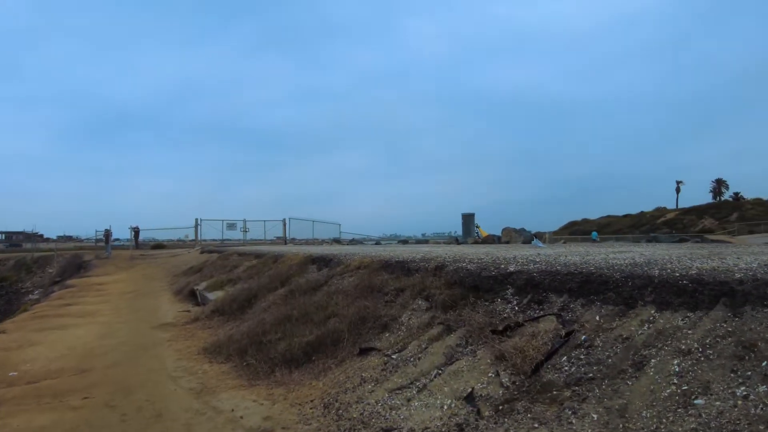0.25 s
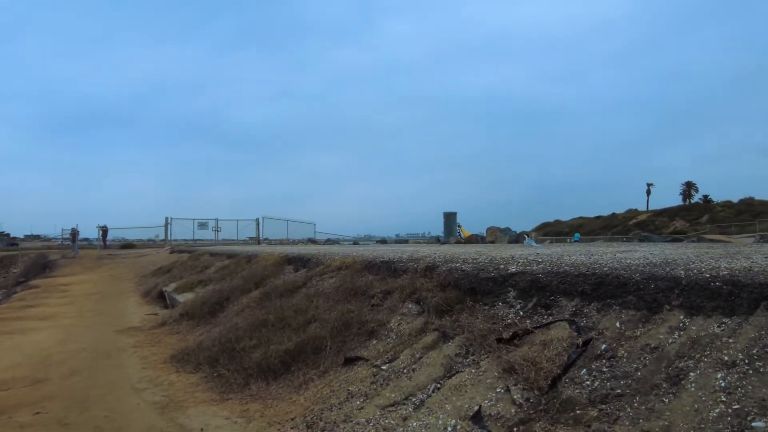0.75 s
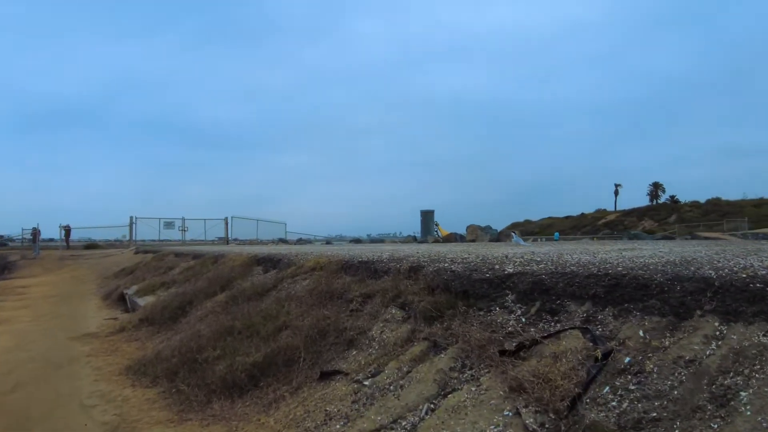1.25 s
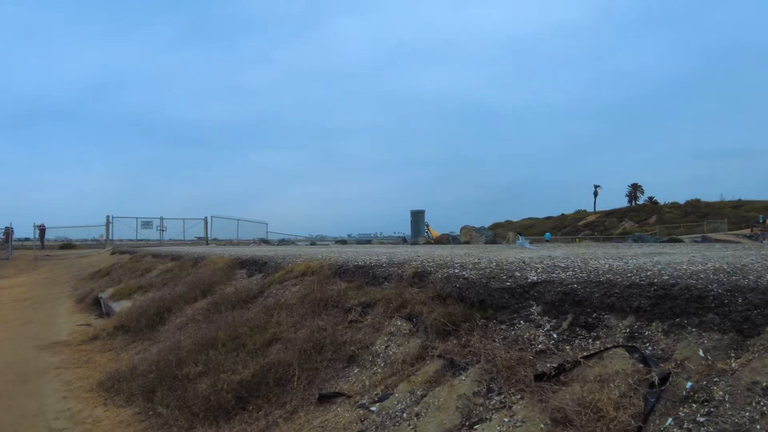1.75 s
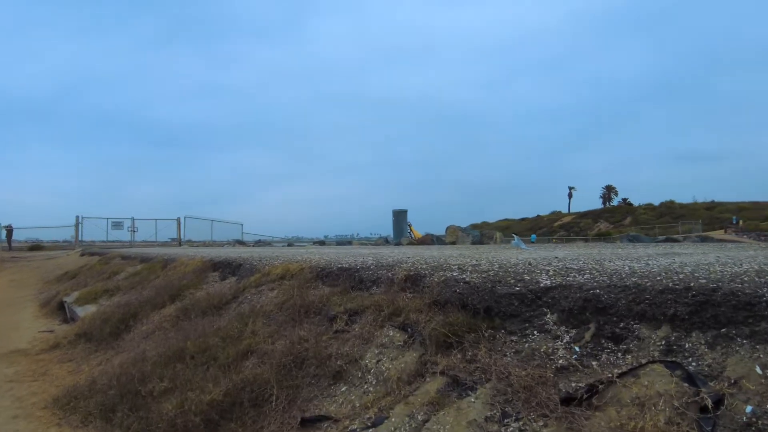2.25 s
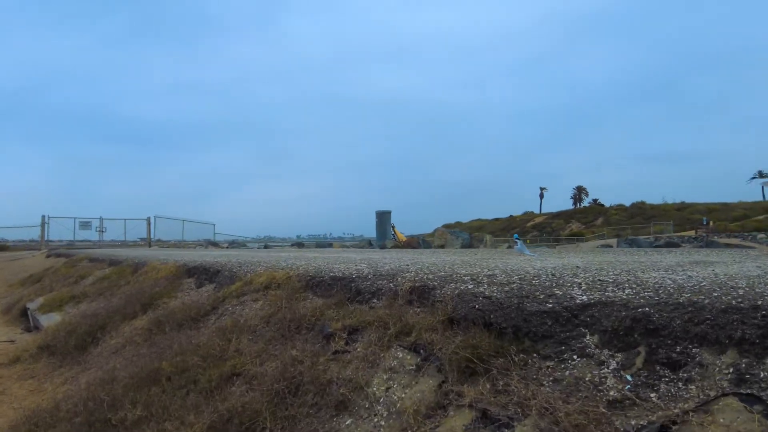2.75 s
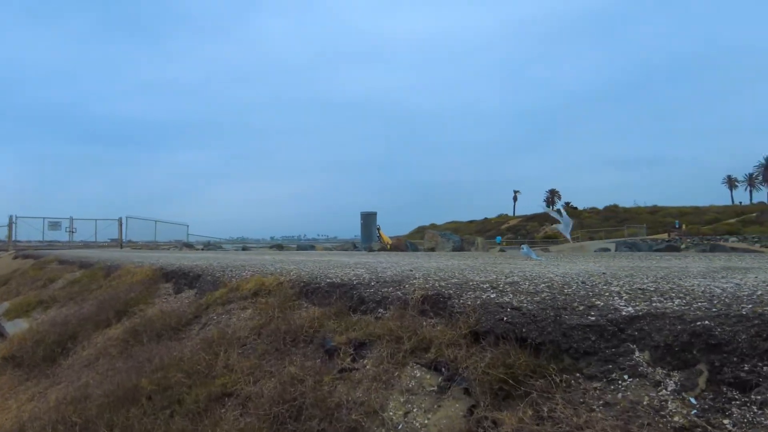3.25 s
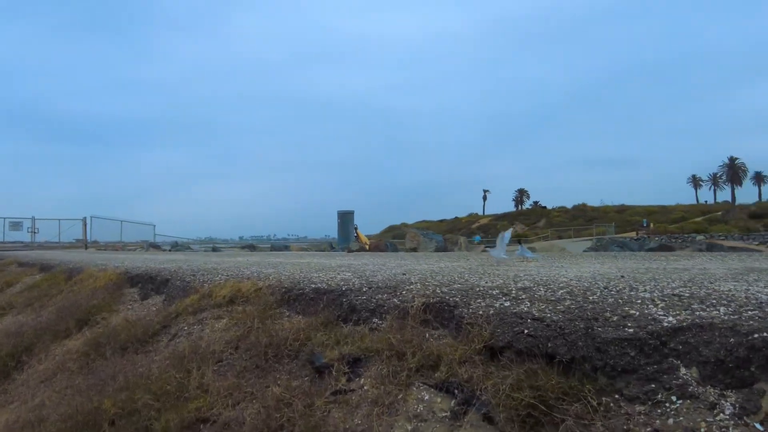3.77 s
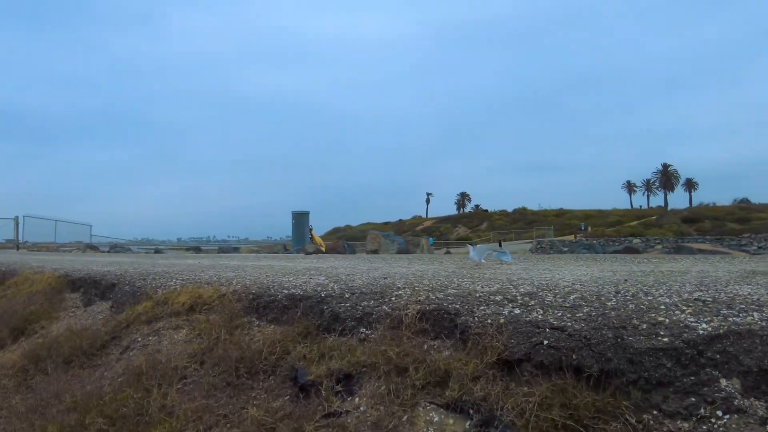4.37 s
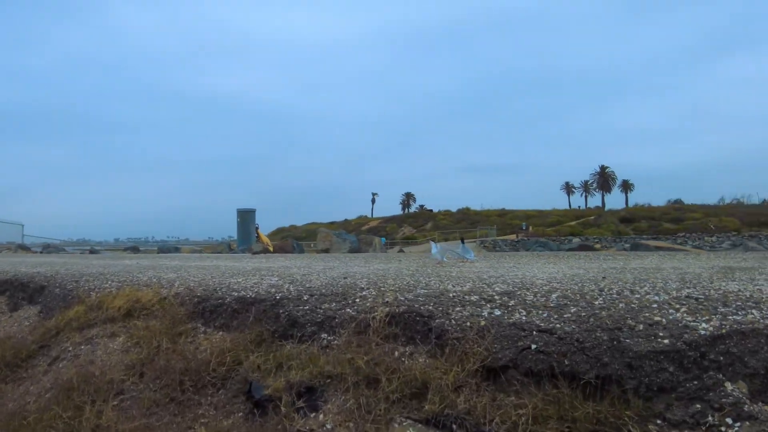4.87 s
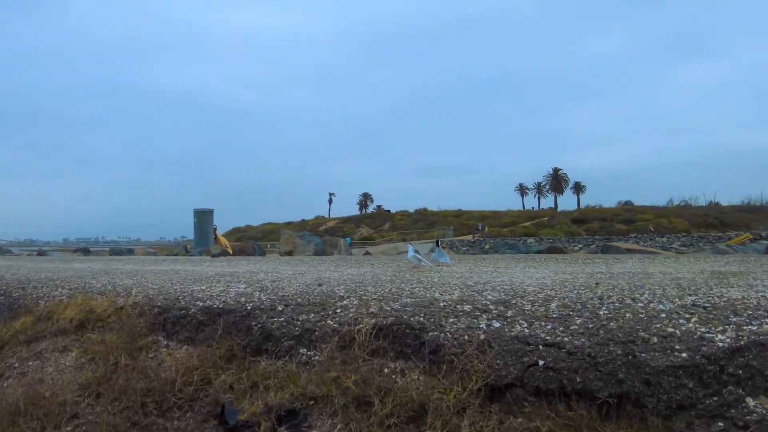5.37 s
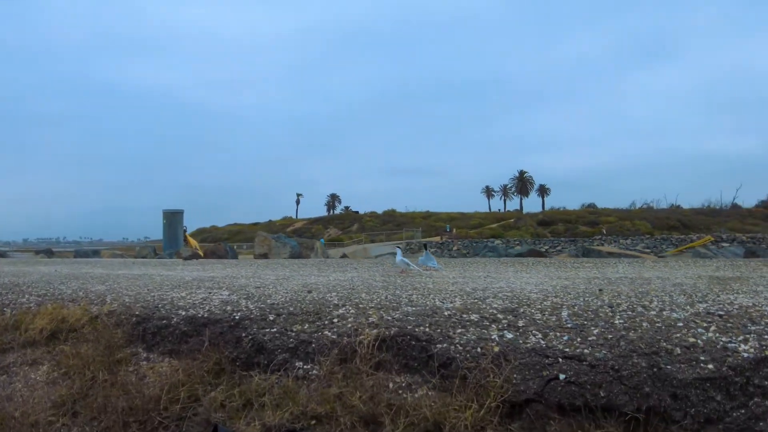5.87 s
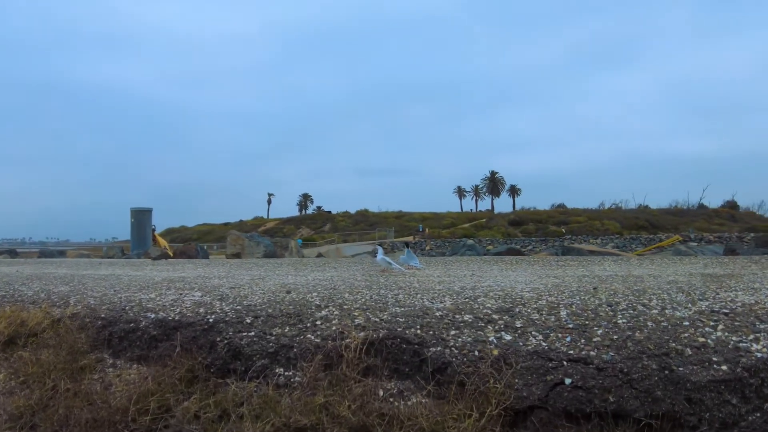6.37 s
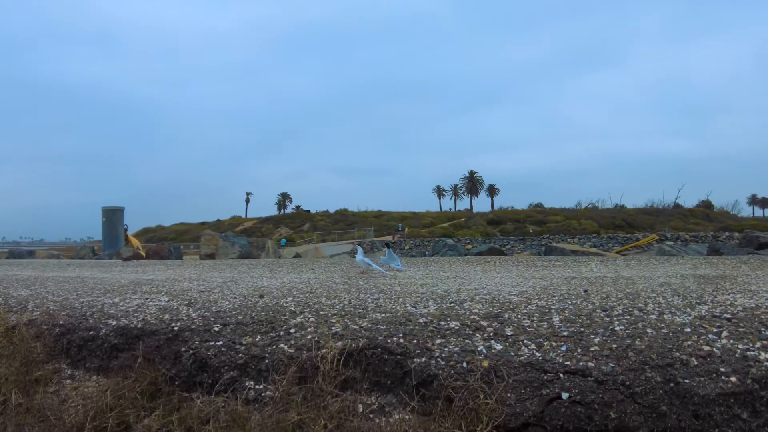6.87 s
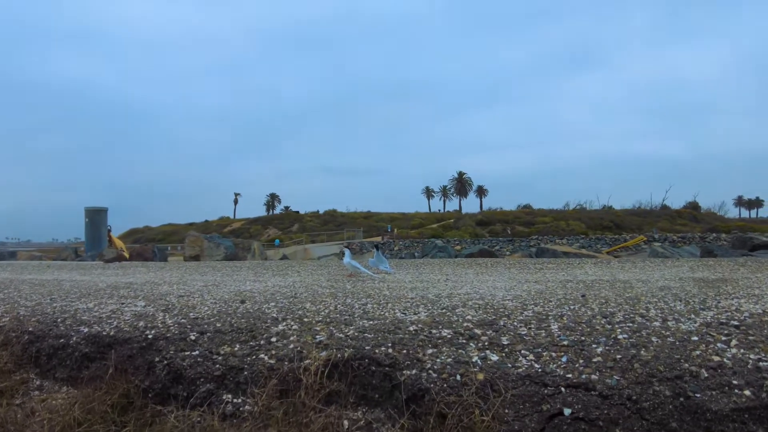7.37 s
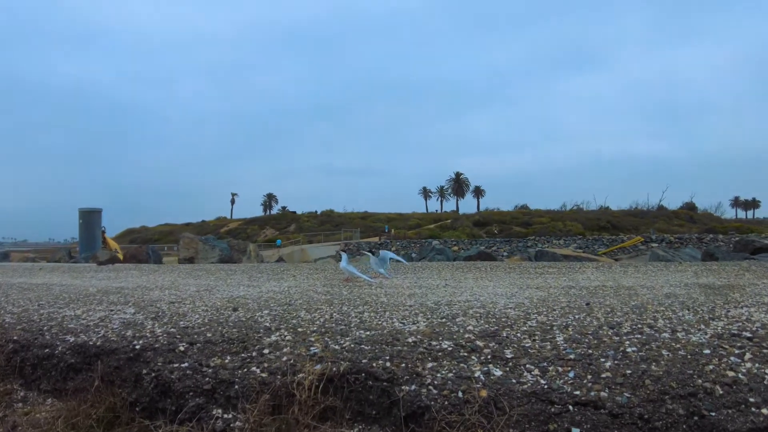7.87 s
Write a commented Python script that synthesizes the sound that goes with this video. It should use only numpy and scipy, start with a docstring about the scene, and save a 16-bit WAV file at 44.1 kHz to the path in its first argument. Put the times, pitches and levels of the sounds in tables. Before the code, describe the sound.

Two terns call outdoors: sharp falling keks and dry rattles, a harsh landing rasp, then lower keks together over low far rumble.

```python
"""Terns on a shell bank

By a coastal marsh, one tern flies in with sharp falling "kek" calls and lands with a rasp; the other answers
in rattling trills, then both call on the ground. Keks are harmonic glides, trills chopped whistles, the rasp
a pulsed ringing throat and the clucks short bursts of uneven cycles. Behind them filtered noise makes far air,
soft footsteps, low wind buffets and a faint high insect; wavering sines make an engine drone and far chirps."""
import sys
import numpy as np
from scipy import signal
from scipy.fft import rfft, irfft, next_fast_len
from scipy.io import wavfile
from scipy.ndimage import map_coordinates

SR = 44100
rng = np.random.default_rng(int(sys.argv[2]) if len(sys.argv) > 2 else 0)


def wrap_up_sound(samples):
    """Save the sound to the file named by the first command line argument, as 16-bit audio."""
    columns = np.atleast_2d(samples).T
    # keep every value between -1 and 1, then stretch to whole-number steps
    tamed = np.clip(columns, -1, 1)
    steps = np.round(tamed * 32767).astype(np.int16)
    wavfile.write(sys.argv[1], SR, steps)


N = 358091
TIME = np.arange(N) / SR
TOP_HZ = 15750  # upper limit of the sound


def undb(db):
    """Decibels to gain."""
    return 10 ** (np.asarray(db) / 20)


def unit(x):
    """Scale to rms 1."""
    return x / np.sqrt(np.mean(x ** 2) + 1e-18)


def curve(table, at):
    """A two-column table joined by straight lines."""
    return np.interp(at, *np.transpose(table))


def colour(points, hz):
    """Gain of a (Hz, dB) spectrum at the given frequencies."""
    f, db = np.transpose(points)
    return undb(np.interp(np.log(hz + 1), np.log(f), db))


def shaped(x, points):
    """Pass a sound through a (Hz, dB) spectrum."""
    size = 2 ** 19
    hz = np.arange(size // 2 + 1) * SR / size
    return irfft(rfft(x, size) * colour(points, hz))[:N]


def resonate(x, hz, width_hz):
    """One resonance, gain 1 at its centre."""
    return signal.lfilter(*signal.iirpeak(min(hz, SR / 2 - 1), hz / width_hz, fs=SR), x)


def ringing_noise(hz, width_hz):
    """Noise of full length through the same resonance twice."""
    return resonate(resonate(rng.standard_normal(N), hz, width_hz), hz, width_hz)


def steady(x):
    """Even out the strength of a narrow-band sound, leaving its wavering pitch."""
    return np.cos(np.angle(signal.hilbert(x, next_fast_len(N))[:N]))


def wander(rate_hz, size):
    """Random drift of spread about 1 that heads for a new value rate_hz times a second."""
    at = np.arange(size) * rate_hz / SR
    return map_coordinates(rng.standard_normal(size + 2), [at], order=1, mode="nearest") * np.sqrt(3 / 2)


def turn(hz):
    """Running phase of a moving frequency."""
    return 2 * np.pi * np.cumsum(hz) / SR


def fade(size, edge_s):
    """A gate with soft edges."""
    t = np.arange(size) / SR
    return np.sin(np.pi / 2 * np.clip(np.minimum(t, t[-1] - t) / edge_s, 0, 1)) ** 2


def swell(centre_s, length_s):
    """A smooth swell over the whole scene, centred on one moment."""
    return np.exp(-np.minimum((2 * (TIME - centre_s) / length_s) ** 2, 50))


def add(out, s, x):
    """Mix a sound in at time s."""
    i = max(int(s * SR), 0)
    out[i:i + len(x)] += x[:max(N - i, 0)]


# Spectrum of the far air. Each row: frequency in Hz, density in dB per Hz.
AIR_SPECTRUM = [(20, -9.5), (60, -3.5), (110, -2), (190, -6.5), (330, -17.5), (450, -21), (620, -21),
                (900, -17), (1550, -19.5), (2300, -28), (3700, -37), (7100, -49), (10200, -60),
                (15500, -59)]
# Swell of the rumble. Each row: time in seconds, level change in dB.
RUMBLE_SWELL = [(0, -.5), (1.1, 2), (2.8, 1.9), (3.3, 0), (4.9, -1.7), (5.4, 1.2), (6.5, 0), (8.1, -1)]
# Swell of the distant rush around 1 kHz. Each row: time in seconds, level change in dB.
RUSH_SWELL = [(0, 1), (2.8, 0.2), (3.5, 3), (4.6, 4), (5.6, -0.4), (8.1, 0.4)]
AIR_DB = -36  # rms of the air before its bands move
THRUM_SWING = 1.4  # the deepest wind thrum swings this many times as far in dB as the rumble
WASH_START_DB, WASH_DB_PER_S = -4.5, 1.08  # the wash around 450 Hz grows steadily


def distant_air():
    """Wind thrum, rumble, wash and rush from far off: coloured noise split into bands that swell apart."""
    size = next_fast_len(N, real=True)
    f = np.arange(size // 2 + 1) * SR / size
    noise = irfft(rfft(rng.standard_normal(size)) * colour(AIR_SPECTRUM, f), size)
    rest = rfft(unit(noise)) * undb(AIR_DB)
    rumble_db = curve(RUMBLE_SWELL, TIME)
    wash_db = WASH_START_DB + WASH_DB_PER_S * TIME
    bands = [(60, THRUM_SWING * rumble_db), (310, rumble_db), (620, wash_db), (2400, curve(RUSH_SWELL, TIME))]
    out = np.zeros(N)
    for edge_hz, db in bands:
        band = rest / (1 + (f / edge_hz) ** 6)
        rest = rest - band  # what is left lies above this edge
        out += irfft(band, size)[:N] * undb(db + 0.5 * wander(6, N))
    return out + irfft(rest, size)[:N] * undb(-3)


# Hum of the far engine. Each row: frequency in Hz, rms level in dB.
ENGINE_TONES = [(97.3, -42.5), (194.6, -55.5)]


def engine_drone():
    """Two tones an octave apart share one wavering engine speed, each with its own drift in level."""
    speed = 1 + 0.0082 * wander(6, N)
    out = np.zeros(N)
    for hz, db in ENGINE_TONES:
        tone = np.sin(turn(hz * speed)) * undb(2 * wander(6, N))
        out += unit(tone) * undb(db)
    return out


# Phrases of the insect. Each row: middle in seconds, level in dB.
INSECT_PHRASES = [(.1, -71), (1.45, -67.5), (2.84, -66.5), (4.224, -68), (5.6, -65), (7.346, -66.5)]
INSECT_PHRASE_S = 0.43


def insect():
    """A very high, thin buzz of narrow-band noise that swells and rests."""
    buzz = unit(ringing_noise(12900, 1400))
    return buzz * sum(undb(db) * swell(s, INSECT_PHRASE_S) for s, db in INSECT_PHRASES)


# Soft footsteps and low wind buffets, the buffets being the rows near 60 to 75 Hz.
# Each row: middle in seconds, length in seconds, centre of the noise in Hz, level in dB.
STEPS_AND_BUFFETS = [(1.029, 0.018, 230, -32), (1.342, 0.12, 286, -38.5), (1.964, 0.1, 60.5, -33),
                     (2.513, 0.15, 75, -33), (2.68, 0.013, 233, -30), (5.872, 0.21, 61.4, -36.5)]


def footsteps_and_buffets():
    """Short thuds and slower gusts of low rumble: low, broadly resonant noise under a smooth swell."""
    out = np.zeros(N)
    for s, length, hz, db in STEPS_AND_BUFFETS:
        out += unit(ringing_noise(hz, hz)) * undb(db) * swell(s, length)
    return out


def chirp(length_s, pitch_hz, sag, db):
    """A thin, soft whistle that sags in pitch."""
    along = np.linspace(0, 1, int(length_s * SR))
    hz = pitch_hz * (1 - sag * along ** 2 + 0.0071 * wander(460, len(along)))
    return np.sin(turn(hz)) * np.sin(np.pi * along) * undb(db)


FAR_CHIRPS_PER_S, FAR_CHIRP_S, FAR_CHIRP_HZ = 4, 0.035, (3900, 5660)  # pitch: lowest, highest
FAR_CHIRP_DB = -59  # the loudest; others lie up to 10 dB lower


def far_chirps():
    """Other birds far across the marsh: small whistles at random times, pitches and levels."""
    out = np.zeros(N)
    for when, pitch, distance in rng.random((int(FAR_CHIRPS_PER_S * N / SR), 3)):
        hz = np.interp(pitch, [0, 1], FAR_CHIRP_HZ)
        add(out, when * N / SR, chirp(FAR_CHIRP_S, hz, 0.024, FAR_CHIRP_DB - 10 * distance))
    return out


# Throat of a cluck. Each row: frequency in Hz, gain in dB.
CLUCK_COLOUR = [(700, -19), (1400, 14), (1900, 17.5), (2700, 19), (3250, 10.5), (3800, -21), (4500, 11.5),
                (6500, 0), (9000, -5), (15000, -30)]
CLUCK_GLIDE, CLUCK_JITTER = 0.11, 0.067  # pitch swing about its mean; scatter of the cycles, both as shares


def cluck(length_s, pitch_hz, db, bright_db):
    """A few uneven, slowing cycles of the syrinx through a broad throat; bright_db sets the high overtones."""
    size = int(length_s * SR)
    hz = pitch_hz * (1 + CLUCK_GLIDE * np.linspace(1, -1, size))
    phase = turn(hz * (1 + CLUCK_JITTER * wander(1200, size)))
    voice = np.zeros(size)
    for k in range(1, 13):
        overtone_db = bright_db * np.clip((k * hz - 3600) / 1800, 0, 1)
        voice += colour(CLUCK_COLOUR, k * hz) * undb(overtone_db) * np.cos(k * phase)
    return unit(voice * fade(size, 0.0011)) * undb(db)


# Short clucks. Each row: start in seconds, length in seconds, mean pitch in Hz, rms level in dB,
# high overtones in dB.
CLUCK_CALLS = [(2.734, 0.0093, 970, -40, -14), (3.394, 0.016, 800, -34, -14), (3.551, 0.02, 804, -33, -26),
               (3.641, .023, 805, -33, -17), (3.714, 0.013, 744, -35.5, -28), (3.779, 0.024, 785, -39, -16),
               (3.852, 0.0084, 817, -38, -24), (3.873, 0.011, 810, -42, -20),
               (3.918, 0.0075, 935, -36, -21), (3.965, .01, 790, -43, -20), (3.99, 0.02, 834, -40.5, -30),
               (4.174, .006, 944, -34, -11), (4.396, 0.014, 1049, -27, -22),
               (4.566, 0.015, 1118, -28.5, -14), (6.436, 0.016, 1060, -36, -12),
               (6.774, 0.018, 1110, -31, -8), (7.941, 0.0127, 1528, -30, -11),
               (8.068, 0.016, 1012, -28.5, -5)]


def clucks():
    """A run of clucks on landing, and single ones between the calls."""
    out = np.zeros(N)
    for s, length, hz, db, bright_db in CLUCK_CALLS:
        add(out, s, cluck(length, hz, db, bright_db))
    return out


# Landing rasps. Each row: start in seconds, length in seconds, throat resonance in Hz, its level in dB,
# level of the upper resonances in dB, fading in dB per second, shrillness of the start from 0 to 1.
RASP_CALLS = [(3.076, 0.038, 2400, -44, -52, 0, 0.06), (3.103, 0.308, 2556, -33.5, -49.5, 3, 1),
              (3.409, .61, 2075, -42, -51.5, 19, .03), (3.468, 0.044, 2500, -32.5, -59, 30, 0.8)]
# Throat of the rasping bird. Each row: frequency in Hz, gain in dB.
RASP_COLOUR = [(2000, 3.5), (6400, -3), (7000, -9), (8000, 1.5), (8700, 0), (15000, -15)]
RASP_RATE_HZ, RASP_EDGE_S = 134, 0.012
# a fully shrill start lifts the resonance and moves its strength upward
SHRILL_S, SHRILL_HZ, SHRILL_UPPER_DB, SHRILL_BODY_DB = 0.081, 563.6, 15.5, -3.5


def rasp():
    """Fast, nearly even pulses ring the throat; a shrill start sinks to a growl."""
    gate = np.exp(np.cos(turn(RASP_RATE_HZ * (1 + 0.02 * wander(140, N) + 0.03 * wander(12, N)))) - 1)
    resonances = [(4360, 900, 4), (5840, 520, 0.5), (7330, 590, -9.5)]  # (Hz, width Hz, dB)
    upper = sum(undb(db) * steady(ringing_noise(hz, width_hz)) for hz, width_hz, db in resonances)
    out = np.zeros(N)
    for s, length, hz, db, upper_db, fading_db, shrillness in RASP_CALLS:
        size = int(length * SR)
        t = np.arange(size) / SR
        span = slice(int(s * SR), int(s * SR) + size)
        shrill = shrillness * np.exp(-(t / SHRILL_S) ** 2)
        whistle = turn((hz + SHRILL_HZ * shrill) * (1 + 0.096 * wander(2400, size)))
        beat = 1 + 0.66 * np.sin(turn(560 * (1 + 0.244 * wander(400, size))))
        ring = np.sin(whistle) * beat + undb(-15) * np.sin(whistle / 2)
        body = unit(gate[span] * ring) * undb(db + SHRILL_BODY_DB * shrill ** 2)
        edge = unit(gate[span] * upper[span]) * undb(upper_db + SHRILL_UPPER_DB * shrill)
        add(out, s, (body + edge) * undb(-fading_db * t) * fade(size, RASP_EDGE_S))
    return shaped(out, RASP_COLOUR)


def trill(rate, pitch_hz, db, share, harsh, swing=0.98, flick=8.1):
    """The syrinx opens about a hundred times a second: a chopped whistle if clear, a dry rattle if harsh."""
    size = len(rate)
    cycles = np.cumsum(rate) / SR
    cycles *= round(cycles[-1]) / (cycles[-1] + 1e-6)  # end on a whole pulse
    # every pulse draws its own timing, pitch and level
    late, sharp, loud = rng.standard_normal((64, 3))[cycles.astype(int)].T
    place = np.clip((2 * (cycles % 1) - 1 + 0.08 * late) / share, -1, 1)  # -1 to 1 while open
    gate = 1 - abs(place) ** 3 + 0.08  # a little sound leaks through between pulses
    hz = pitch_hz * (1 + harsh * (0.0317 * sharp + 0.0865 * wander(2200, size)))
    phase = turn(hz) + flick * place ** 3  # the pitch flicks up at both edges of a pulse
    # (multiple of the whistle, dB)
    partials = [(1 / 2, -10 - 6 * harsh), (1, 0), (3 / 2, -23 + 8 * harsh), (2, -24), (5 / 2, -37), (3, -38)]
    voice = sum(undb(level_db) * np.sin(k * phase) for k, level_db in partials)
    # a second membrane spreads side bands
    beat = 1 + swing * harsh * np.sin(turn(620 * (1 + 0.249 * wander(400.5, size))))
    hiss = undb(-29) * harsh * rng.standard_normal(size)
    effort_db = db - 3 * np.linspace(-1, 1, size) ** 4 + 0.29 * loud
    return (voice * beat + hiss) * gate * undb(effort_db) * fade(size, 0.0079)


# Short rattling trills. Each row: first pulse in seconds, last pulse in seconds, pulses per second,
# level in dB before the throat, harshness from 0 to 1.
RATTLE_CALLS = [(.053, .183, 121, -33.5, 1), (0.252, 0.38, 109, -33, .95), (0.454, .575, 110, -33.5, .94),
                (0.659, 0.776, 98, -34, .98), (0.853, .982, 90, -34.5, .98), (1.047, 1.174, 99, -33.5, 1),
                (1.258, 1.341, 96, -37.5, .98), (2.944, 3.008, 105, -33, 0.7),
                (4.514, 4.632, 103, -25, 0.63), (4.714, 4.849, 111, -27, 0.75),
                (4.929, 5.048, 95, -26, 0.59), (5.133, 5.254, 94, -26.5, 0.57),
                (5.337, 5.435, 84, -31, 0.87)]
# Long "kreer" trills. Each row: first pulse in seconds, last pulse in seconds, level in dB before the throat,
# harshness at the start from 0 to 1.
KREER_CALLS = [(1.862, 2.069, -24.5, 0.18), (4.184, 4.427, -20, 0.15), (6.462, 6.694, -20.5, 0.19)]
# Throat of the trilling bird. Each row: frequency in Hz, gain in dB.
TRILL_COLOUR = [(800, 3), (1300, 0.5), (2000, 7.5), (2700, -1.5), (3300, 0.5), (3800, -15), (4500, -1),
                (5100, -12.5), (5800, -9), (6600, 1.5), (7800, -6), (8800, -7), (15000, -8)]
RATTLE_HZ = (2433, 2278)  # pitch, start and end
RATTLE_OPEN, RATTLE_SPEEDUP = 0.63, 0.069  # open share of a cycle; rate swing about its mean
KREER_HZ, KREER_RATE_HZ = (2638, 2170), (74, 103)  # pitch and pulse rate, start and end
KREER_SWELL_DB, KREER_SWELL_S = 2, 0.044
KREER_SAG_POWER, KREER_OPEN, KREER_FADE_DB, KREER_HARSHENS = 2.1, 0.79, 11, 0.65
# the low cluck that ends a trill: its level against the trill, its lag after the last pulse
CLOSING_S, CLOSING_HZ, CLOSING_DB, CLOSING_LAG_S = 0.0134, 851, -7.5, 0.0029


def trills():
    """Rattles quicken a little; a kreer sinks, quickens, fades and turns harsh. Each closes with a cluck."""
    out, closings = np.zeros(N), np.zeros(N)
    for first, last, rate, db, harsh in RATTLE_CALLS:
        along = np.linspace(0, 1, int((last - first + 1 / rate) * SR))
        rates = rate * (1 + RATTLE_SPEEDUP * (2 * along - 1))
        hz = np.interp(along, [0, 1], RATTLE_HZ)
        add(out, first - 0.5 / rate, trill(rates, hz, db, RATTLE_OPEN, harsh))
        add(closings, last + CLOSING_LAG_S, cluck(CLOSING_S, CLOSING_HZ, db + CLOSING_DB, bright_db=-39))
    for first, last, db, harsh in KREER_CALLS:
        period = 1 / np.mean(KREER_RATE_HZ)
        along = np.linspace(0, 1, int((last - first + period) * SR))
        t = np.arange(len(along)) / SR
        hz = KREER_HZ[1] + (KREER_HZ[0] - KREER_HZ[1]) * (1 - along) ** KREER_SAG_POWER
        rates = np.interp(along, [0, 1], KREER_RATE_HZ)
        effort_db = db - KREER_SWELL_DB * np.exp(-t / KREER_SWELL_S) - KREER_FADE_DB * along
        harshness = harsh + KREER_HARSHENS * along ** 2
        add(out, first - period / 2, trill(rates, hz, effort_db, KREER_OPEN, harshness))
        closing_db = db - KREER_FADE_DB / 2 + CLOSING_DB
        add(closings, last + CLOSING_LAG_S, cluck(CLOSING_S, CLOSING_HZ, closing_db, bright_db=-30))
    return shaped(out, TRILL_COLOUR) + closings


KEK_SWELL_S, KEK_CLEARS_S = 0.011, 0.004
KEK_ROUGH, KEK_END_ROUGH = 0.013, 0.58  # roughness in the middle; added as the voice gives out
KEK_BRIGHT_DB_PER_OCTAVE = 46  # a tenser syrinx sings higher and brighter
KEK_OPENING_DB, KEK_OPENING_S = 6.5, 0.0023  # the overtones build up as the bill opens
KEK_HISS_DB = -22  # hiss against the voice, before the call's own brightness


def keks(table, throat, usual_hz, hold, fall, arch, drop, sustain, swell_db, release_db, end_overtones_db,
         fundamental_db, third_db, upper_db, jitter, shimmer, ground_db, brightening_db_per_s=0):
    """A harsh start clears into an arched harmonic glide, its levels set against the second harmonic."""
    out = np.zeros(N)
    middle_s = (table[0][0] + table[-1][0]) / 2
    for s, length, top_hz, level_db in table:
        size = int(length * SR)
        t, along = np.arange(size) / SR, np.arange(size) / size
        released = np.maximum(along - sustain, 0) / (1 - sustain)
        db = level_db - swell_db * np.exp(-t / KEK_SWELL_S) - release_db * released
        rough = KEK_ROUGH + np.exp(-(t / KEK_CLEARS_S) ** 2) + KEK_END_ROUGH * released ** 4

        bend = 1 - drop * np.tanh((np.maximum(along - hold, 0) / fall) ** arch)
        scoop_hz = 0.58 * max(top_hz - 1470, 0) * np.exp(-t / 0.0078)  # the highest calls rise from below
        hz = top_hz * bend - scoop_hz
        phase = turn(hz * (1 + min(jitter, 0.1) * rough * wander(1500, size)))  # jitter stops at 0.1

        tension_db = KEK_BRIGHT_DB_PER_OCTAVE * np.log2(top_hz / usual_hz)
        tension_db = tension_db - KEK_OPENING_DB * np.exp(-t / KEK_OPENING_S)
        slack_db = -22 * np.clip(1 - hz / top_hz, 0, 1)
        trend_db = brightening_db_per_s * (s - middle_s)  # a run of calls may grow brighter
        third_now_db = third_db + 0.88 * tension_db + end_overtones_db * released / 2
        upper_now_db = upper_db + tension_db + trend_db + end_overtones_db * released
        gains = [undb(fundamental_db), 1, undb(third_now_db)]
        for k in range(4, 13):
            # a slackening syrinx loses its highest overtones first
            gain = undb(upper_now_db + slack_db * (k - 0.5)) * colour(throat, k * hz)
            gains.append(gain * (k * hz < TOP_HZ))
        voice = np.zeros(size)
        for k, gain in enumerate(gains, 1):
            voice += gain * np.sin(k * phase) * undb(0.78 * wander(83, size))

        # rough cycles alternate strong and weak
        doubling = 1 + shimmer * rough * (np.sin(phase / 2) + 0.24 * wander(900, size))
        hiss_db = KEK_HISS_DB + upper_db / 2 - 8 * released ** 3
        hiss = undb(hiss_db) * resonate(rng.standard_normal(size), 5500, 5000)
        call = (voice * doubling + hiss) * undb(db) * fade(size, 0.0029)
        add(out, s, call)
        # the bounce off the ground beats against the glide
        add(out, s + rng.uniform(0.0024, 0.005), call * undb(ground_db))
    return out


# Keks on the ground. Each row: start in seconds, length in seconds, top pitch in Hz, level in dB.
GROUND_CALLS = [(4.74, 0.069, 1332, -24), (4.91, 0.082, 1333, -23.5), (5.147, 0.076, 1340, -22),
                (5.422, 0.065, 1324, -22.5), (5.608, 0.089, 1326, -22), (5.847, 0.088, 1325, -24),
                (6.072, 0.095, 1306, -24), (6.45, .09, 1337, -20.5), (6.782, .067, 1312, -21.5),
                (7.035, 0.094, 1313, -22.5), (7.241, 0.09, 1319, -23.5)]
# Throat on the ground, for harmonics 4 and up. Each row: frequency in Hz, gain in dB.
GROUND_COLOUR = [(3500, -8), (5300, 0), (6600, -2), (8100, -5.5), (8700, -16.5), (10600, -15.5),
                 (12000, -24.5), (15500, -27)]
# How a kek is sung, here and in the two styles below. Overtone levels in dB hold at usual_hz.
# The pitch holds, then falls by up to the share "drop", arch being the power of the bend;
# hold, fall and sustain (before the level dies away) are shares of the length.
# Swell, release, end overtones and ground bounce are in dB; jitter and shimmer are shares, scaled by roughness.
GROUND_MANNER = dict(usual_hz=1318, hold=.2, fall=1.04, arch=1.7, drop=.6, sustain=0.35, swell_db=3, release_db=13, end_overtones_db=11, brightening_db_per_s=0.8, fundamental_db=-9, third_db=-13, upper_db=-17, jitter=0.094, shimmer=1, ground_db=-11)


def ground_keks():
    """The lower keks on the ground, their upper overtones gaining strength from call to call."""
    return keks(GROUND_CALLS, GROUND_COLOUR, **GROUND_MANNER)


# Keks in flight. Each row: start in seconds, length in seconds, top pitch in Hz, level in dB.
FLIGHT_CALLS = [(0.097, 0.082, 1687, -32.5), (0.334, .071, 1675, -32), (.575, 0.079, 1709, -29.5),
                (0.784, 0.083, 1689, -28), (.985, 0.083, 1703, -28), (1.219, 0.08, 1704, -26.5),
                (1.43, 0.08, 1694, -26), (1.632, 0.084, 1681, -26), (1.846, 0.084, 1622, -27),
                (2.062, 0.072, 1586, -26.5), (2.272, 0.072, 1545, -24), (2.465, 0.073, 1530, -21.5),
                (2.667, 0.069, 1513, -21)]
# The drawn-out kek just before landing. Each row: start in seconds, length in seconds, top pitch in Hz,
# level in dB.
LANDING_CALL = [(2.849, 0.16, 1519, -20)]
# Throat in flight, for harmonics 4 and up. Each row: frequency in Hz, gain in dB.
FLIGHT_COLOUR = [(4000, 6), (5200, 6.5), (6200, 2.5), (6800, -8.5), (7500, -12), (9000, -23.5),
                 (11000, -30), (15500, -27.5)]
# The manner of the keks in flight and of the landing kek, with the settings named above.
FLIGHT_MANNER = dict(usual_hz=1700, hold=.34, fall=.67, arch=1.3, drop=.33, sustain=0.48, swell_db=5, release_db=10.5, end_overtones_db=-8.5, fundamental_db=-14.5, third_db=-0.5, upper_db=-.5, jitter=.13, shimmer=0.13, ground_db=-8)
LANDING_MANNER = dict(usual_hz=1530, hold=0.17, fall=.315, arch=0.78, drop=.195, sustain=0.19, swell_db=2.5, release_db=17, end_overtones_db=4, fundamental_db=-17, third_db=-9, upper_db=-11.5, jitter=0.13, shimmer=0.69, ground_db=-31)
LEAD_IN_S, LEAD_IN_DB, LEAD_IN_SAG = 0.036, -53, 0.038  # sag as a share of the pitch


def flight_keks():
    """The falling keks of the arriving bird, the last drawn out, each after a faint lead-in whistle."""
    out = keks(FLIGHT_CALLS, FLIGHT_COLOUR, **FLIGHT_MANNER)
    out += keks(LANDING_CALL, FLIGHT_COLOUR, **LANDING_MANNER)
    for s, _, top_hz, _ in FLIGHT_CALLS + LANDING_CALL:
        whistle_hz = 3.05 * top_hz  # near the third harmonic of the kek
        add(out, s - LEAD_IN_S, chirp(LEAD_IN_S, whistle_hz, LEAD_IN_SAG, LEAD_IN_DB))
    return out


def scatter(x, t60, wet_db):
    """The shell bank and rocks throw back a faint, dull tail: decaying noise as an echo pattern."""
    t = np.arange(SR // 2) / SR
    tail = resonate(rng.standard_normal(len(t)), 1800, 3800) * undb(-60 * t / t60) * (t > 0.004)
    return signal.fftconvolve(x, tail / np.sqrt(np.sum(tail ** 2)))[:N] * undb(wet_db)


# Phase-turned share of the birds that sets left against right. Each row: frequency in Hz, gain in dB.
SIDE_COLOUR = [(700, -65), (1500, -65.5), (2800, -61), (5000, -31.5), (12000, -42)]


def scene():
    """All sources stand nearly dead ahead; only a trace of phase in the calls differs between the ears."""
    birds = far_chirps() + clucks() + rasp() + trills() + ground_keks() + flight_keks()
    background = distant_air() + engine_drone() + insect() + footsteps_and_buffets()
    mid = background + birds + scatter(birds, t60=0.13, wet_db=-21)
    side = signal.hilbert(shaped(birds, SIDE_COLOUR), next_fast_len(N))[:N].imag
    return np.array([mid + side, mid - side])


def record(dry):
    """The recorder cuts the top with a steep low-pass."""
    return signal.sosfilt(signal.ellip(10, 0.2, 70, TOP_HZ, fs=SR, output="sos"), dry)


dry = scene()
out = record(dry)
wrap_up_sound(out)
```